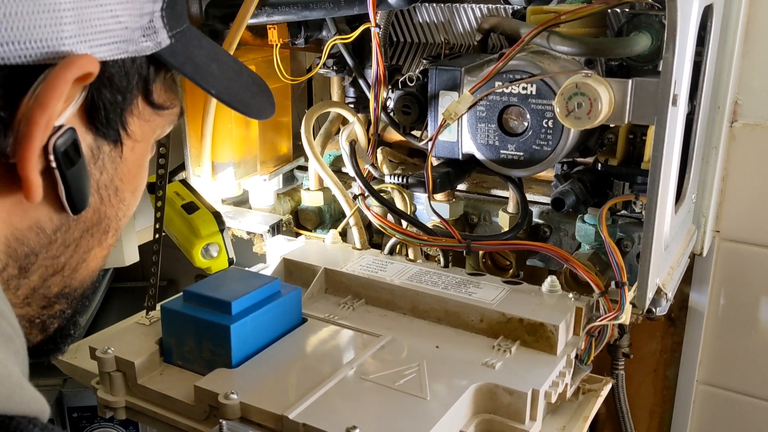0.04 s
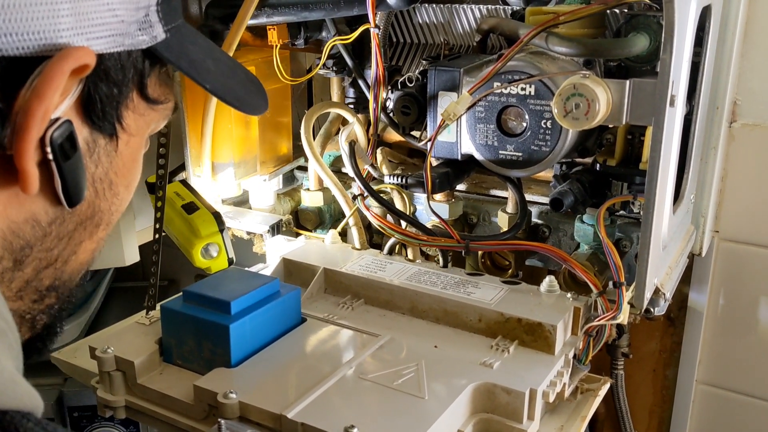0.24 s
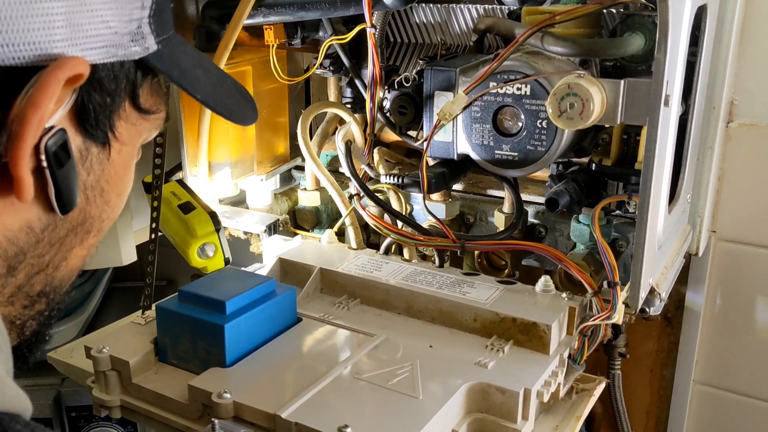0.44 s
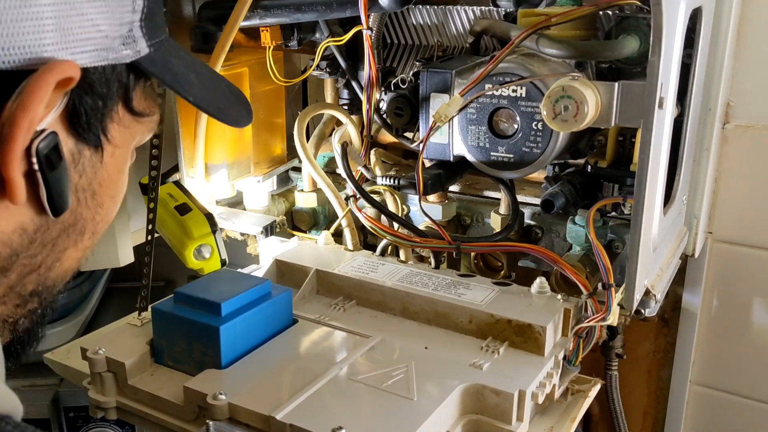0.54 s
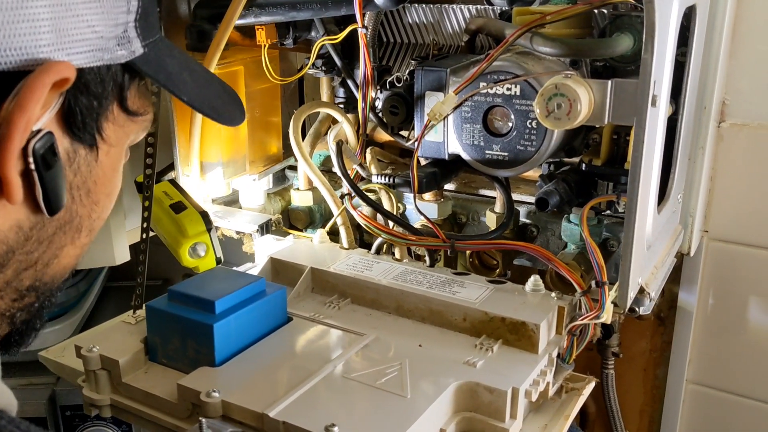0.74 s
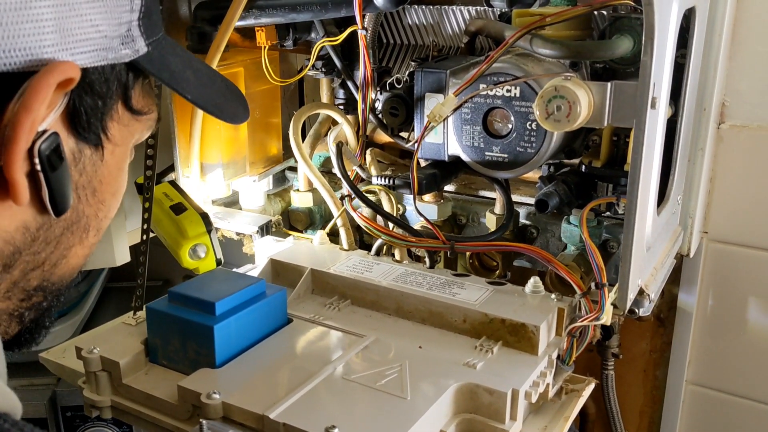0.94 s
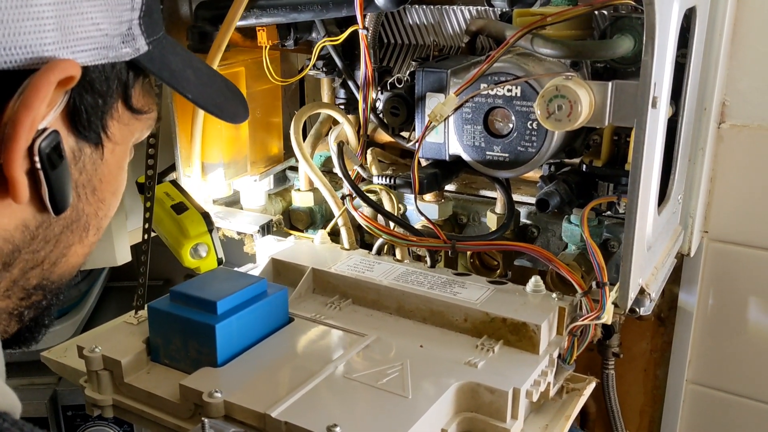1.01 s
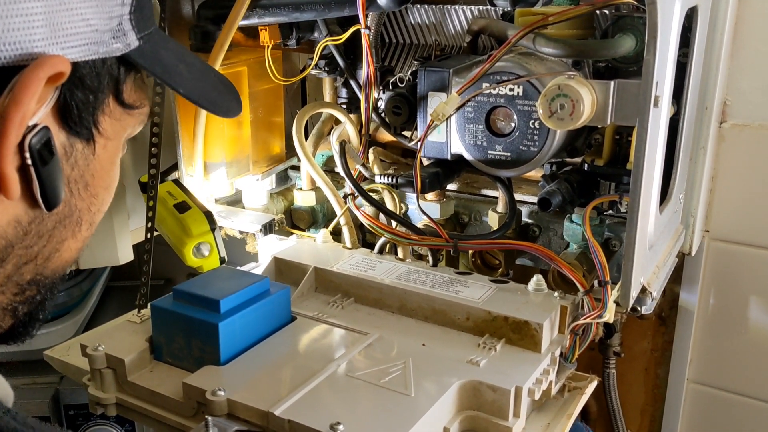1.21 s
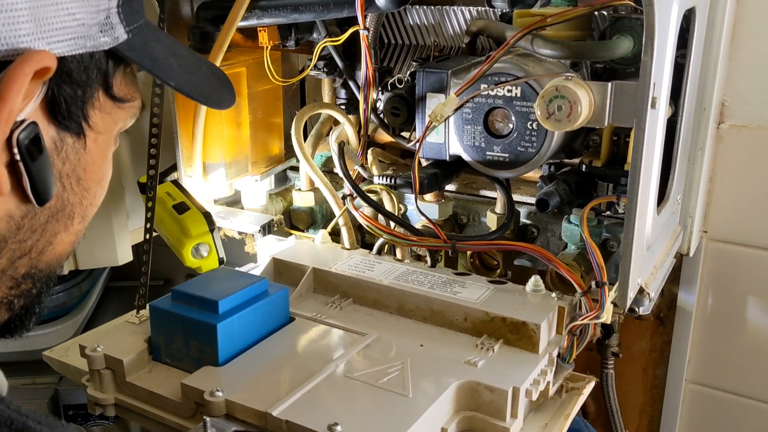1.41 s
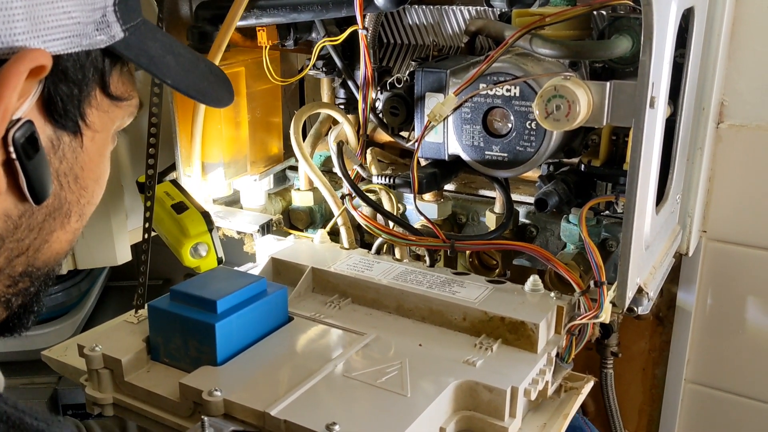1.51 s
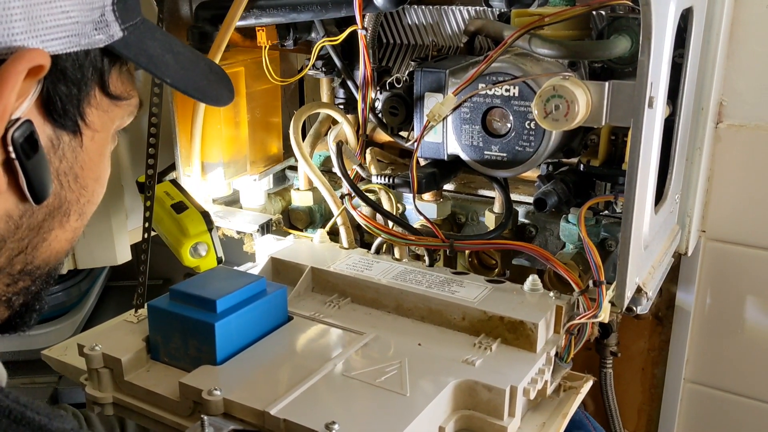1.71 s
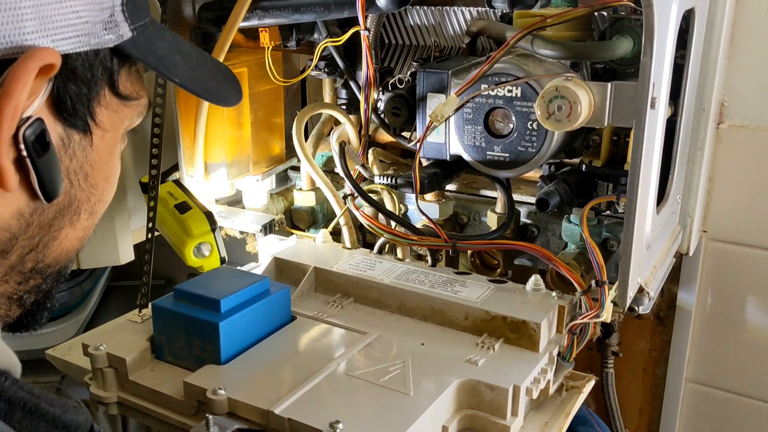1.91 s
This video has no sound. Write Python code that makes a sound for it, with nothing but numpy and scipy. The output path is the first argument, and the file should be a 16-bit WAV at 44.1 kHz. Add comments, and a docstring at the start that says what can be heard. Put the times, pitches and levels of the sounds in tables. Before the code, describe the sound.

Close by in a small hard room, metal grips clink on a heating appliance's pipework. A quick run of clicks leads to a loud ringing knock, then a second one, with small squeaks and scrapes, before light ticks trail off.

```python
"""Metal pipe grips worked onto a nut inside an open heating appliance in a small hard room.
Each contact pings the jaws, knocks the pipes and sheet casing, and dies away in the room.
Between contacts the jaws scrape and squeak along the pipe.
Behind them: a quiet room floor with one faint tone, and a treble hiss that fades by 1 s."""
import sys
import numpy as np
from scipy import signal
from scipy.fft import rfft, irfft
from scipy.io import wavfile
from scipy.ndimage import uniform_filter1d

SR = 44100
rng = np.random.default_rng(int(sys.argv[2]) if len(sys.argv) > 2 else 0)


def put_to_file(sound):
    """Save the sound as 16-bit audio at rate SR, in the file named by the first command-line argument."""
    columns = np.atleast_2d(sound).T  # one column per channel
    safe = np.clip(columns, -1, 1)
    whole_steps = np.round(safe * 32767)
    wavfile.write(sys.argv[1], SR, whole_steps.astype(np.int16))


N = 85995

# knock band centres: f/Hz
BAND_HZ = [90, 220, 560, 1400, 2600, 4000, 7000, 13000]


def amp(db):
    return 10 ** (np.asarray(db) / 20)


def unit_rms(x):
    return x / np.sqrt(np.mean(x ** 2) + 1e-20)


def envelope(points):
    """Gain per sample from rows of t/s, level/dB."""
    t_s, db = np.transpose(points)
    return amp(np.interp(np.arange(N) / SR, t_s, db))


def pan(db):
    """Stereo gains for a left-minus-right level."""
    return amp([[db / 2], [-db / 2]])


def noise_spectra(size, correlation):
    """Spectra of two partly correlated white noises."""
    a, b = rfft(rng.standard_normal((2, size)))
    return np.array([a, correlation * a + np.sqrt(1 - correlation ** 2) * b])


def resonate(x, hz, width_hz, stages=2):
    """Cascade of equal unity-gain resonances."""
    carrier = np.exp(2j * np.pi * hz * np.arange(1, x.shape[-1] + 1) / SR)
    pole = np.exp(-np.pi * width_hz / SR)
    for _ in range(stages):
        x = 2 * (carrier * signal.lfilter([1 - pole], [1, -pole], x / carrier)).real
    return x


def room_floor():
    """Quiet room and microphone hiss, with one faint wavering tone."""
    # noise density: f/Hz, relative level/dB
    spectrum = [(20, -43), (45, -1.5), (100, -3), (230, 2), (600, -10.5), (1000, -13), (1700, -19.5),
                (2300, -15), (3200, -20), (10000, -23.5), (12500, -22.5)]
    # stereo likeness: f/Hz, correlation
    likeness = [(60, .9), (500, 0.47), (3000, 0.18), (12000, 0.1)]
    floor_db, tone_db = -62.5, -78
    log_hz = np.log(np.fft.rfftfreq(N + 1, 1 / SR) + 1)
    hz, correlation = np.transpose(likeness)
    noise = noise_spectra(N + 1, np.interp(log_hz, np.log(hz), correlation))
    hz, db = np.transpose(spectrum)
    noise *= amp(np.interp(log_hz, np.log(hz), db))
    tone = resonate(rng.standard_normal(N), hz=1245, width_hz=15, stages=1)
    return amp(floor_db) * unit_rms(irfft(noise)[:, :N]) + amp(tone_db) * unit_rms(tone)


def treble_hiss():
    """Faint high-passed noise, fading."""
    # hiss envelope: t/s, level/dB
    fade = [(0, -63.5), (.35, -63.5), (.82, -67.5), (1.0, -88)]
    highpass = signal.butter(2, 10490, "high", fs=SR, output="sos")
    return unit_rms(signal.sosfilt(highpass, rng.standard_normal((2, N)))) * envelope(fade)


def scrape():
    """Uneven slips of the jaws shake the pipework."""
    # jaws dragging: t/s, level/dB
    drag = [(.24, -100), (.27, -43.5), (.36, -50.5), (.72, -76.5), (.79, -45.5), (.835, -40), (.86, -74.5),
            (1.08, -51.5), (1.13, -65.5), (1.3, -87), (1.82, -85.5), (1.87, -60.5), (1.95, -68)]
    # pipework resonances: f/Hz, width/Hz, relative level/dB
    resonances = [(113, 82, -6), (230, 260, -4), (556, 92, 1), (1230, 600, -7), (2380, 1100, -8.5)]
    slips_per_s, crossfeed = 4300, 0.23
    slips = (rng.random((2, N)) < slips_per_s / SR) * rng.standard_normal((2, N))
    slips = slips + crossfeed * slips[::-1]
    pipes = sum(amp(db) * unit_rms(resonate(slips, hz, width_hz)) for hz, width_hz, db in resonances)
    return unit_rms(pipes) * envelope(drag)


def squeak():
    """Rubbing jaws squeak on unsteady tones."""
    # jaws rubbing: t/s, level/dB
    rub = [(.24, -100), (.26, -44), (.31, -38), (.35, -42), (.36, -55.5), (.4, -37.5), (.62, -71.5),
           (.83, -66.5), (.85, -100)]
    # squeak tones: f/Hz, relative level/dB
    tones = [(2320, -2), (2550, -3), (10100, -25)]
    wander = unit_rms(uniform_filter1d(rng.standard_normal((len(tones), N)), size=60))
    warped_s = np.cumsum(1 + .022 * wander, axis=1) / SR  # 2.2 % rms pitch wander
    jaws = sum(amp(db) * np.sin(2 * np.pi * hz * t) for (hz, db), t in zip(tones, warped_s))
    return jaws * envelope(rub) * pan(-6)


def pipe_ring(t, band_db, rises_s):
    """Struck pipes and casing ring in decaying modes, each driven by the blow's level at its pitch."""
    # pipe and casing modes: f/Hz, relative level/dB, T60/s
    modes = [(220.5, 1, 0.3), (353.2, -5, 0.43), (423, -1, 0.26), (522.4, -0.5, 0.24), (582, -5, 0.33),
             (815, -6, 0.41), (1365, 3, 0.11), (1740, -15, 0.2), (2023, -7, 0.22), (2695, -5, .15)]
    out = 0
    for (hz, db, t60_s), phase in zip(modes, rng.random(len(modes))):
        rise_s, left_db, right_db = (np.interp(np.log(hz), np.log(BAND_HZ), v)
                                     for v in (rises_s, *band_db))
        ring = (1 - np.exp(-t / rise_s)) * np.sin(2 * np.pi * (hz * t + phase))
        out = out + ring * amp(db - 60 * t / t60_s) * amp([[left_db], [right_db]])
    return out


def grip_shimmer(t, noise, drive_db, rise_s):
    """Crowded high modes of the grips, as a decaying noise band."""
    gain_db, t60_s = -5, .3
    band = unit_rms(resonate(noise, hz=6650, width_hz=700))
    return band * (1 - np.exp(-t / rise_s)) * amp(drive_db + gain_db - 60 * t / t60_s)


def knock(t, contact_s, pan_db, blow_db):
    """One blow: crack and room tail per band, plus ringing metal. Shorter contacts crack harder."""
    # per band: rise/s at the reference contact time
    ref_rises_s = [0.063, 0.027, 0.0035, 0.0027, 0.00046, 0.00083, 0.00056, .001]
    # per band: room T60/s
    room_t60_s = [0.85, 0.38, 0.33, 0.24, 0.22, 0.21, 0.18, 0.13]
    # per band: crack over room tail/dB at the reference contact time
    crack_db = [-10, -15, -11.5, -4.5, 7, 8.5, 1.5, 4]
    # per band: left-right correlation
    correlation = [0.94, 1, 0.59, 0.095, 0.13, 0.45, 0.59, .8]
    # per band: share of the pan
    pan_share = [-0.16, -0.17, -0.11, 1, 0.6, -0.83, 1, .8]
    # hollow colour of the casing: f/Hz, width/Hz, gain/dB
    hollow = [(645, 200, 6), (2293, 110, 7.5), (5770, 510, -5), (7200, 500, 1.5), (12700, 1100, 7.5)]
    ref_contact_s, thud_db, late_t60_s = 0.0043, -13, 1.2
    late_db = np.linspace(-30.5, -41, len(BAND_HZ))
    levels_db = np.array([blow_db[0] + thud_db, *blow_db])  # the 90 Hz thud follows the 220 Hz band
    band_db = levels_db + np.outer([pan_db / 2, -pan_db / 2], pan_share)
    rises_s = np.array(ref_rises_s) * contact_s / ref_contact_s
    bin_hz = np.fft.rfftfreq(len(t), 1 / SR)
    log_hz, log_bands = np.log(bin_hz + 1), np.log(BAND_HZ)
    noise = noise_spectra(len(t), np.interp(log_hz, log_bands, correlation))
    noise *= amp(sum(db / (1 + (2 * (bin_hz - hz) / width_hz) ** 2) for hz, width_hz, db in hollow))
    crack = np.exp(-(t / contact_s) ** 2) * np.sqrt(ref_contact_s / contact_s)
    out = pipe_ring(t, band_db, rises_s) + grip_shimmer(t, irfft(noise), levels_db[-2], rises_s[-2])
    for k, weights in enumerate(np.eye(len(BAND_HZ))):
        band = unit_rms(irfft(noise * np.interp(log_hz, log_bands, weights))) * amp(band_db[:, [k]])
        tail = amp(-60 * t / room_t60_s[k]) + amp(late_db[k] - 60 * t / late_t60_s)
        out += band * (1 - np.exp(-t / rises_s[k])) * (amp(crack_db[k]) * crack + tail)
    return out


def metal_note(t, db, hz, contact_s, pan_db, echo_pan_db=0):
    """Struck metal sounds one short note, rings on weakly and echoes faintly at its pitch."""
    rise_s, hold_s, ring_db, ring_t60_s = .0006, 1.47 * contact_s, -15, .05
    echo_rise_s, echo_db, echo_t60_s = 0.002, -23, 0.29
    decay = np.exp(-(t / hold_s) ** 2) + amp(ring_db - 60 * t / ring_t60_s)
    note = np.sin(2 * np.pi * hz * t) * (1 - np.exp(-t / rise_s)) * decay
    echo = unit_rms(resonate(rng.standard_normal((2, len(t))), hz, width_hz=0.29 * hz))
    echo *= np.minimum(t / echo_rise_s, 1) * amp(echo_db - 60 * t / echo_t60_s)
    return amp(db) * (note * pan(pan_db) + echo * pan(echo_pan_db))


def scene():
    """Contacts, friction and hiss, low-cut, over the room floor."""
    # contacts: t/s, note level/dB, note f/Hz, contact/s, pan/dB, blow level/dB per band from 220 Hz up
    contacts = [(-.02, -20.5, 2187, 0.0052, -4.5, -30.5, -34, -35.5, -41.5, -51.5, -48, -45.5),
                (0.0688, -37.5, 2350, 0.0018, -5.5, -44.5, -58, -41, -51, -65.5, -70, -81),
                (.148, -32, 590, 0.0067, -3, -33, -35.5, -42.5, -52.5, -73, -63.5, -70),
                (0.1998, -26, 2336, 0.00505, -10, -44.5, -34, -37.5, -43.5, -56, -53.5, -44.5),
                (0.2379, -15, 2375, 0.0039, -8, -52, -37.5, -40, -37.5, -49.5, -55.5, -51.5),
                (0.3991, -7, 2370, 0.0037, -8, -37.5, -46, -37.5, -30, -46.5, -40.5, -35.5),
                (.4185, -23, 2328, 0.0065, -3.5, -27, -23.5, -27.5, -23.5, -27.5, -24, -31),
                (0.768, -49.5, 2650, 0.004, -12, -54, -50.5, -57, -55.5, -72, -67, -75),
                (0.8404, -11, 2366, 0.0042, -5, -30.5, -26, -28.5, -26.5, -36.5, -34, -38),
                (1.083, -48, 2100, 0.0052, -4.5, -45.5, -51.5, -57.5, -57.5, -66.5, -72, -82),
                (1.166, -54.5, 2100, 0.012, -5, -46.5, -59.5, -62.5, -66, -83, -83, -91),
                (1.342, -52.5, 2450, 0.0028, -5.5, -74, -86, -64, -71, -92, -85.5, -83.5),
                (1.535, -46.5, 622, 0.007, 2.5, -73.5, -49, -75.5, -93.5, -88, -88, -87),
                (1.708, -51, 603, 0.0079, -3, -64.5, -53.5, -59.5, -69.5, -86, -71.5, -78)]
    # short metal notes ringing with the loud knocks, and light lone taps: t/s, level/dB, f/Hz, contact/s
    notes = [(.387, -26.5, 2380, 0.016), (.421, -20, 3390, .005), (0.4233, -11, 2780, 0.0027),
             (.44, -25.5, 215.7, 0.029), (0.423, -22.5, 865, 0.0058), (.842, -20.5, 3190, .002),
             (.842, -20, 3800, 0.0038), (.842, -24.5, 575, 0.018), (.843, -26, 756, .013),
             (1.585, -49.5, 316.5, 0.0091), (1.846, -55.5, 2280, 0.0016), (1.916, -55.5, 2300, 0.0021)]
    lead_samples, right_lag_samples = 2205, 3  # the lead holds a contact just before t = 0
    mix = np.zeros((2, lead_samples + N + SR))
    t = np.arange(24576) / SR
    for start_s, db, hz, contact_s, pan_db, *blow_db in contacts:
        at = lead_samples + round(start_s * SR)
        mix[:, at:at + len(t)] += knock(t, contact_s, pan_db, blow_db)
        mix[:, at:at + len(t)] += metal_note(t, db, hz, contact_s, pan_db, echo_pan_db=.3 * pan_db)
    t = np.arange(SR // 2) / SR
    for start_s, db, hz, contact_s in notes:
        at = lead_samples + round(start_s * SR)
        mix[:, at:at + len(t)] += metal_note(t, db, hz, contact_s, pan_db=-3)
    left, right = mix[0, lead_samples:], mix[1, lead_samples - right_lag_samples:]
    work = np.array([left[:N], right[:N]]) + scrape() + squeak() + treble_hiss()
    low_cut = signal.butter(3, 81, "high", fs=SR, output="sos")
    return signal.sosfilt(low_cut, work) + room_floor()


def record(dry):
    """Soft clip, then band limit."""
    ceiling, cutoff_hz = .95, 15800
    soft = ceiling * np.tanh(dry / ceiling)
    lowpass = signal.firwin(511, cutoff_hz, window=("kaiser", 9), fs=SR)
    return signal.oaconvolve(soft, lowpass[None], "same")


dry = scene()
out = record(dry)
put_to_file(out)
```